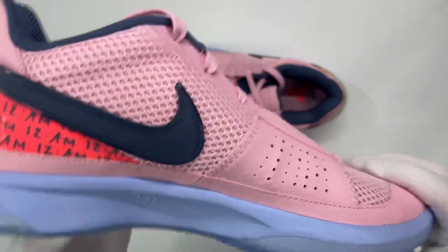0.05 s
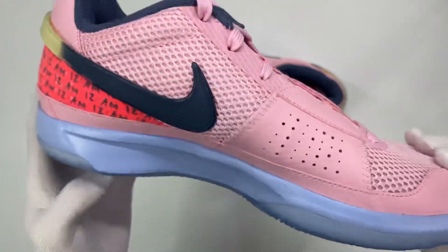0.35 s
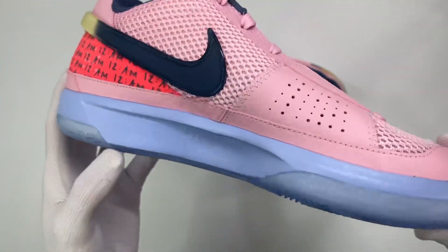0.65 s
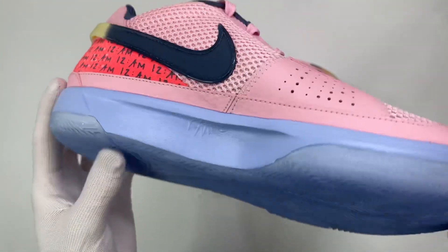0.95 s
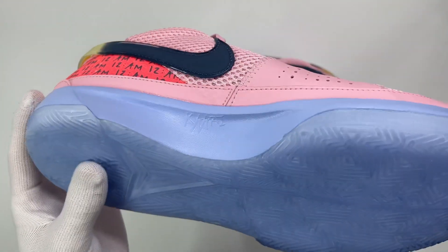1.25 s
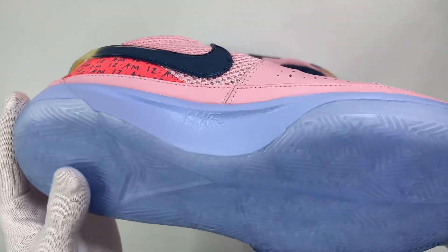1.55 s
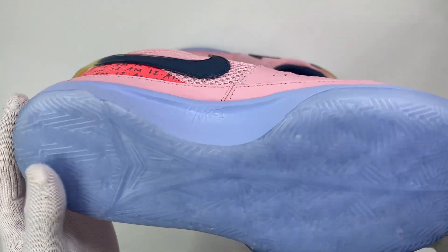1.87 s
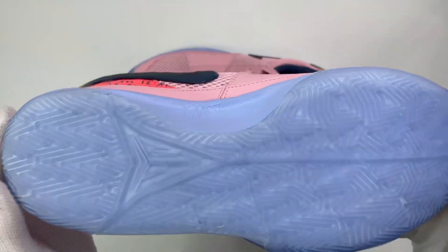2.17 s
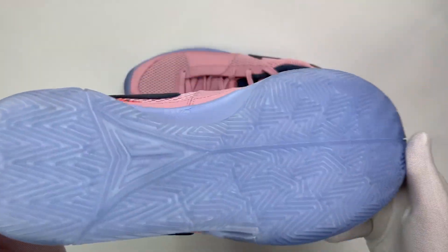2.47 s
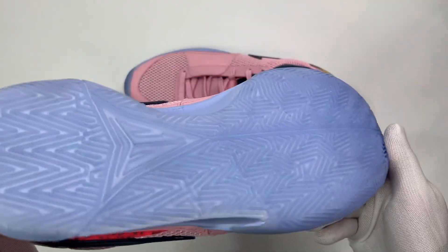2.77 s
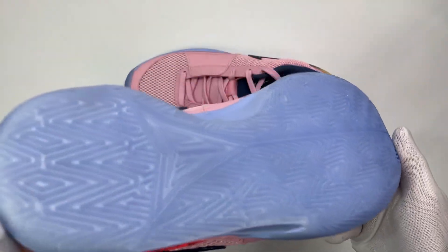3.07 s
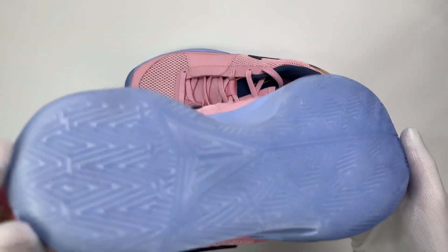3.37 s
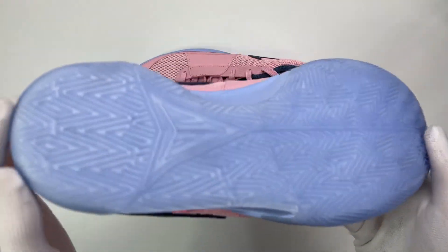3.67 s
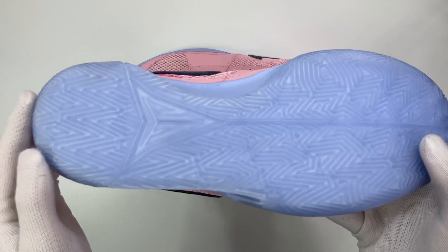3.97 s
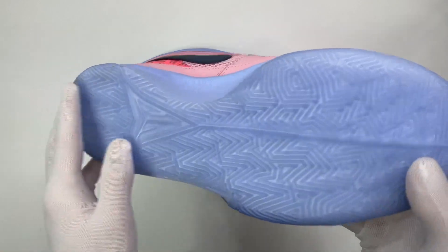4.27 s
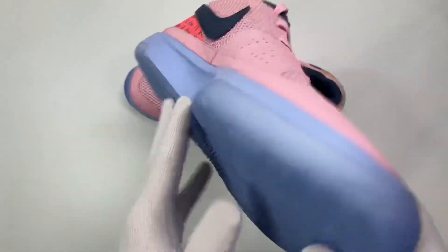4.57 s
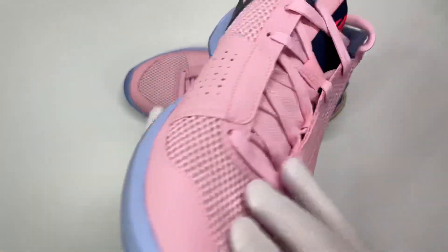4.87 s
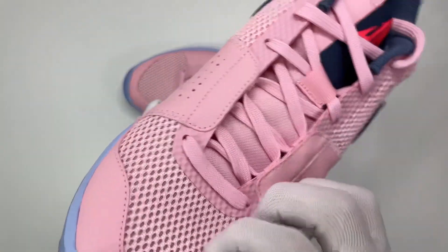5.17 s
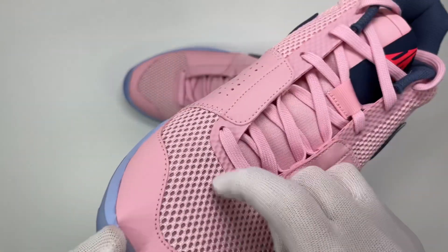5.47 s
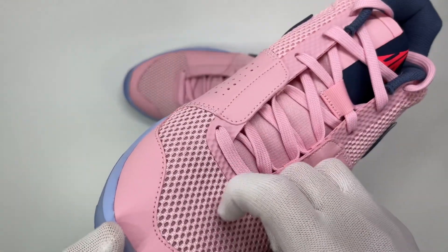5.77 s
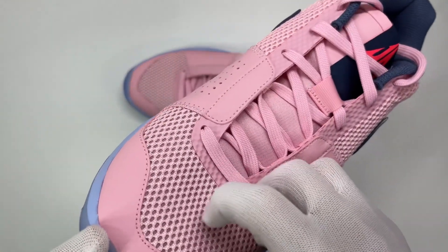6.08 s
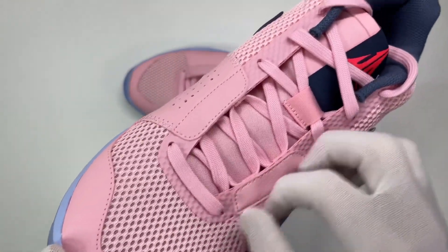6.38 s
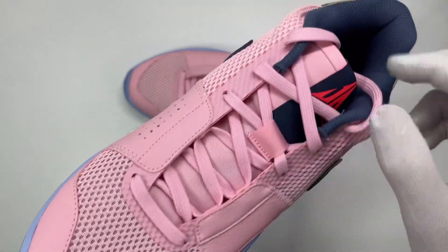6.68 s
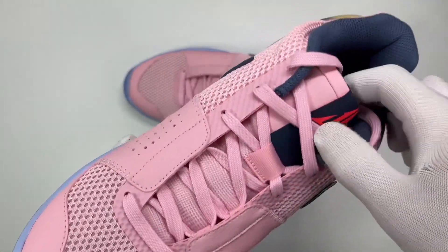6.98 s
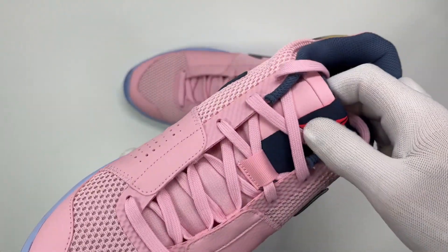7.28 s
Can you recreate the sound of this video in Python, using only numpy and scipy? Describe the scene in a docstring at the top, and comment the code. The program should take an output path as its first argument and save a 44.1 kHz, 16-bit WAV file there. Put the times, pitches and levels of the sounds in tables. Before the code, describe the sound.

Gloved hands turn a sneaker over, fabric rubbing and rasping on sole and mesh, with small ticks and a few hollow knocks.

```python
"""Gloved hands turn a sneaker over a table, close to a pair of microphone ports in a small room.
First the shoe rolls over: the knit hisses and rasps on sole and upper, and the friction sounds its hollow.
From 2.6 s the fingers shift round the sole, knocking softly as the rubber ticks; from 4.4 s it turns upright.
At 5.6 s a finger presses the mesh toe box three times, sticking and snapping from cell to cell.
From 6.2 s the hand slides up the laces to the tongue."""
import sys
import numpy as np
from scipy import signal
from scipy.fft import rfft, irfft, next_fast_len
from scipy.io import wavfile
from scipy.ndimage import uniform_filter1d

SR = 44100
rng = np.random.default_rng(int(sys.argv[2]) if len(sys.argv) > 2 else 0)


def output_pcm(signal):
    """Save a mono or channel-first signal as 16-bit PCM at the path in sys.argv[1].

    Samples are clipped to [-1, 1] before scaling.
    """
    pcm = np.clip(np.atleast_2d(signal).T, -1, 1) * 32767
    wavfile.write(sys.argv[1], SR, np.round(pcm).astype(np.int16))


N = 327663
TIME = np.arange(N) / SR


def gain_of(db):
    """Decibels to amplitude."""
    return 10 ** (np.asarray(db) / 20)


def unit_rms(x):
    """Scales to rms 1."""
    return x / np.sqrt(np.mean(x ** 2) + 1e-20)


def spectrum_db(points, hz):
    """Interpolates a spectrum table over log frequency."""
    f, db = np.transpose(points)
    return np.interp(np.log(hz + 1), np.log(f + 1), db)


def add(mix, start_s, sound):
    """Mixes a sound in at start_s."""
    part = mix[round(start_s * SR):][:len(sound)]
    part += sound[:len(part)]


def coloured(x, points):
    """Filters by a spectrum table."""
    size = next_fast_len(x.shape[-1])
    gain = gain_of(spectrum_db(points, np.fft.rfftfreq(size, 1 / SR)))
    return irfft(rfft(x, size) * gain, size)[..., :x.shape[-1]]


def resonate(x, hz, width_hz, stages=1):
    """Cascade of unity-gain resonances; the centre may move."""
    carrier = np.exp(2j * np.pi * np.cumsum(hz * np.ones(len(x))) / SR)
    pole = np.exp(-np.pi * width_hz / SR)
    for _ in range(stages):
        x = 2 * (carrier * signal.lfilter([1 - pole], [1, -pole], x / carrier + 1e-18)).real
    return x


def drift(rate_hz, points=N, t=TIME):
    """Gaussian values at rate_hz, joined by straight lines."""
    return np.interp(t * rate_hz, np.arange(points), rng.standard_normal(points))


# Spectra of room rumble and air: (frequency [Hz], level [dB])
RUMBLE_SPECTRUM = [(20, -45), (35, -18), (50, -7), (70, -1.5), (100, -4.5), (130, -14.5), (200, -21),
                   (400, -35.5), (1000, -68)]
AIR_SPECTRUM = [(150, -9), (270, 14), (400, -10), (600, -23), (1000, -12), (3000, -4), (7000, -10),
                (16000, -11)]
# Weight shifts of arms and shoe: (centre [s], half length [s], level [dB])
THUDS = [(4.3, 0.026, -60), (5.38, 0.37, -62.5), (5.775, 0.042, -51), (6.044, 0.027, -46),
         (6.264, 0.064, -54), (7.305, 0.52, -62)]


def background(rumble_db=-69.5, air_db=-77.5, unshared_db=-10.5):
    """Room rumble, dull thuds and faint air, mostly common to both ports."""
    noise = rng.standard_normal(N) + gain_of(unshared_db) * rng.standard_normal((2, N))
    thud_power = sum(gain_of(db) ** 2 * np.exp(-np.minimum(((TIME - s) / half_s) ** 2, 20))
                     for s, half_s, db in THUDS)
    rumble = unit_rms(coloured(noise, RUMBLE_SPECTRUM)) * np.sqrt(gain_of(rumble_db) ** 2 + thud_power)
    air = unit_rms(coloured(noise[:, ::-1], AIR_SPECTRUM)) * gain_of(air_db)
    return rumble + air


# Echoes off table and hands, and the room tail: (frequency [Hz], level re direct [dB])
NEAR_ECHOES = [(100, -21), (400, -4), (900, -1), (1600, -5), (3000, 0.5), (4600, -10), (5600, -13),
               (6200, -74), (7500, -14), (10200, -48), (16000, -18)]
ROOM_TAIL = [(100, -30), (200, -18), (400, -5.5), (1000, -6), (4000, -18), (5700, -47), (16000, -45)]


def reflections(x, spectrum, t60_s, drift_hz, paths, gap_s=0.002, pad=1024):
    """Decaying echoes, different at each port; the paths crossfade as shoe and hands move."""
    shares = np.array([drift(drift_hz, 256) for _ in range(paths)])
    shares /= np.linalg.norm(shares, axis=0)
    t = np.arange(pad + round(t60_s * SR)) / SR
    out = np.zeros((2, N))
    for share in shares:
        tail = rng.standard_normal((2, len(t))) * gain_of(-60 * t / t60_s) * (t > gap_s)
        tail = coloured(tail / np.linalg.norm(tail, axis=1, keepdims=True), spectrum)
        out += signal.oaconvolve((x * share)[None], tail[:, :-pad], axes=1)[:, :N]
    return out


# Phase of the right port behind the left: (frequency [Hz], lag [rad])
PORT_LAG = [(0, 0), (800, -1.1), (1500, -.1), (2900, 1.9), (4500, 1), (5900, np.pi), (14600, 5 * np.pi),
            (16000, 17.4)]


def ports(x):
    """Direct sound reaches the two ports out of phase."""
    lag = np.interp(np.fft.rfftfreq(N, 1 / SR), *np.transpose(PORT_LAG))
    return irfft(rfft(x) * np.exp(0.5j * np.array([lag, -lag])), N)


# Pitched catches of the glove: (centre [s], length [s], level [dB], pitch [Hz], width [Hz])
SCUFFS = [(3.167, 0.1, -64.5, 1120, 550), (6.358, 0.071, -48, 520, 150), (6.476, 0.14, -57, 865, 350),
          (6.516, 0.17, -48.5, 387, 83), (7.179, 0.13, -54.5, 840, 450), (7.263, 0.033, -43, 2770, 5460)]


def scuffs():
    """The glove grips briefly and chatters free."""
    out = np.zeros(N)
    for s, length_s, db, hz, width_hz in SCUFFS:
        swell = np.hanning(round(length_s * SR))
        chatter = resonate(rng.standard_normal(SR // 4), hz, width_hz, stages=2)[-len(swell):]
        add(out, s - length_s / 2, gain_of(db) * unit_rms(chatter) * swell)
    return out


# Rubber and lace tips: (time [s], level [dB], pitch [Hz], t60 [s], rattle re tick [dB])
TICKS = [(0.1357, -38, 4900, 0.003, -16), (0.902, -35.5, 11000, 0.001, -17),
         (2.6475, -41.5, 1970, 0.005, -2.5), (2.9577, -40, 1860, 0.0029, -6.5),
         (4.095, -40.5, 11700, 0.0015, -10.5), (4.6684, -21, 12000, 0.00072, -17.5),
         (5.6247, -43, 3450, 0.0015, -10), (6.037, -32.5, 8000, 0.00074, -8.5),
         (7.409, -28.5, 11500, 0.0006, -36)]


def ticks(rattle_t60_s=0.012):
    """A tiny snap rings for a few cycles and trails off in a fine rattle."""
    out, t = np.zeros(N), np.arange(SR // 20) / SR
    for s, db, hz, t60_s, rattle_db in TICKS:
        snap = np.sin(2 * np.pi * hz * t) * gain_of(-60 * t / t60_s)
        rattle = unit_rms(coloured(rng.standard_normal(len(t)), HISS_SPECTRUM))
        rattle *= gain_of(-60 * t / rattle_t60_s)
        add(out, s, gain_of(db) * (snap + gain_of(rattle_db) * rattle))
    return out


# Modes of the shoe: (frequency [Hz], width [Hz], level [dB])
SHOE_MODES = [(175, 14, -6), (230.8, 19, -1), (270.3, 12.3, 1), (383, 13.7, 3), (457.3, 7.9, -6.5),
              (490.7, 19.3, -1), (587, 53, -3), (624, 20, -5), (721, 12, -8), (844, 17, -10),
              (996, 136, -10)]


def shoe_ring(x, low_cut_hz=160, size=8192):
    """Minimum-phase response of the shoe; a small body radiates no deep bass."""
    hz = abs(np.fft.fftfreq(size, 1 / SR))
    power = sum(gain_of(db) ** 2 / (1 + (2 * (hz - f) / width) ** 2) for f, width, db in SHOE_MODES)
    power = power * hz ** 4 / (hz ** 4 + low_cut_hz ** 4)
    log_gain = np.log(power + 1e-10) / 2
    response = np.fft.ifft(np.exp(np.conj(signal.hilbert(log_gain)))).real
    return signal.oaconvolve(x, response[:size // 2])[:len(x)]


# Soft finger blows: (time [s], peak [dB], pitch [Hz], crunch re blow [dB])
KNOCKS = [(0.1358, -36.5, 680, -7), (0.9022, -49.5, 710, -14), (2.65, -60, 480, -15),
          (2.958, -54.5, 503, -9), (4.502, -42, 715, -19), (4.616, -43.5, 580, -10),
          (4.686, -38.5, 610, -12), (5.068, -36.5, 467, -5), (5.3235, -38, 626, -1.5),
          (5.3296, -32.5, 403, -15), (5.757, -25, 245, -29), (5.864, -40, 400, -14),
          (5.9934, -23, 430, -19), (6.009, -16.5, 375, -19), (6.018, -20.5, 290, -24),
          (6.038, -15.5, 314, -14.5), (6.134, -38.5, 450, -3), (6.155, -36, 300, -5.5),
          (6.992, -42.5, 560, -4), (7.09, -35, 656, -30), (7.358, -32, 598, -15)]


def knocks(push_s=0.00095, overshoot=0.4, flatten_s=0.00092, direct_db=-11, crunch_t60_s=0.0069):
    """A push, falling in pitch as the fingertip flattens, rings the shoe while the fabric crunches."""
    out, t = np.zeros(N), np.arange(SR // 5) / SR
    for s, db, hz, crunch_db in KNOCKS:
        cycles = np.cumsum(hz * (1 + overshoot * np.exp(-t / flatten_s))) / SR
        push = np.sin(2 * np.pi * cycles) * t * np.exp(-t / push_s)
        ring = unit_rms(shoe_ring(push)) + gain_of(direct_db) * unit_rms(push)
        crunch = unit_rms(resonate(rng.standard_normal(len(t)), hz=2010, width_hz=480))
        crunch *= gain_of(-60 * t / crunch_t60_s)
        add(out, s, gain_of(db) * (ring / abs(ring).max() + gain_of(crunch_db) * crunch))
    return out


# The glove jerks free, mostly from cell to cell of the mesh: (time [s], friction jump [dB])
SLIPS = [(0.136, 3), (5.6844, 10), (5.6997, 11), (5.7124, 8), (5.7272, 6), (5.749, 11), (5.7844, 14.5),
         (5.8732, 5), (5.9935, 3), (6.009, 9), (6.0175, 7), (6.038, 10)]


def stick_slip_db(stick_s=0.0047, stick_share=0.73, slip_s=0.0015):
    """Friction sinks while the fingertip sticks, leaps as it slips, then settles."""
    out = np.zeros(N)
    for s, jump_db in SLIPS:
        age_s = TIME - s
        fade = np.exp(-np.minimum(abs(age_s) / np.where(age_s < 0, stick_s, slip_s), 20))
        out += jump_db * np.where(age_s < 0, -stick_share, 1) * fade
    return out


def crackle(rasp_level, snap_gain_db=21.5, seam_gain_db=29.5, seams_per_s=45):
    """Each slip starts with a dry snap; seams and tread pluck the glove at random, more dully."""
    slips = np.zeros(N)
    slips[[int(s * SR) + 1 for s, _ in SLIPS]] = 1
    seams = rng.uniform(-0.85, 1, N) * (rng.random(N) < seams_per_s / SR)
    snaps = resonate(slips * rasp_level, hz=2300, width_hz=1700)
    plucks = resonate(seams * rasp_level, hz=1290, width_hz=1290)
    return gain_of(snap_gain_db) * snaps + gain_of(seam_gain_db) * plucks


def snags(per_s, spread_db, clump_db, clump_hz):
    """Threads catch and let go: clumps of tiny, uneven clicks."""
    sizes = rng.standard_normal(N) * gain_of(spread_db * np.minimum(rng.exponential(1, N), 4))
    clumps = gain_of(clump_db * drift(clump_hz))
    return unit_rms(sizes * (rng.random(N) < per_s / SR) * clumps)


def judder(pressure, per_s=160, release_s=0.001, light_depth=0.24, hard_depth=0.51):
    """Gain of jerky sliding: random catches start at once and die away, deeper under pressure."""
    kicks = rng.exponential(1, N).clip(0, 3) * (rng.random(N) < per_s / SR)
    catches = signal.lfilter([1], [1, -np.exp(-1 / (release_s * SR))], kicks)
    gain = 1 + (light_depth + (hard_depth - light_depth) * pressure) * catches
    return gain / np.sqrt(uniform_filter1d(gain ** 2, size=2600))


# Spectra of the knit's hiss and top fizz: (frequency [Hz], level [dB])
HISS_SPECTRUM = [(1500, -16), (3500, -5), (5600, 1.5), (8000, 3.5), (12000, -1.5), (14000, -3.5),
                 (16000, -19)]
FIZZ_SPECTRUM = [(4000, -59), (9000, -11), (12000, 17), (16000, -7)]


def knit_hiss(jerks, fizz_db):
    """Dense, fine snags merge into a hiss."""
    fine = snags(per_s=14000, spread_db=0, clump_db=1.47, clump_hz=148.3) * np.sqrt(jerks)
    hiss = unit_rms(coloured(fine, HISS_SPECTRUM))
    fizz = unit_rms(coloured(fine, FIZZ_SPECTRUM))
    return unit_rms(hiss + gain_of(fizz_db) * fizz)


# Spectrum of knit scraping the shoe: (frequency [Hz], level [dB])
RASP_SPECTRUM = [(150, -54), (400, -21), (900, 3), (1400, -0.5), (2200, -2), (3300, -3), (4700, -2.5),
                 (6400, -7.5), (10000, -17.5)]


def surface_rasp(jerks, pressure, grain_hz, grain_db=-12.5, pressed_boost_db=7.5):
    """Coarser snags; pressure brings out the grain, higher on fine tread than on open mesh."""
    coarse = snags(per_s=9000, spread_db=-0.35, clump_db=1.0, clump_hz=121.8) * jerks
    scrape = unit_rms(coloured(coarse, RASP_SPECTRUM))
    grain = unit_rms(resonate(coarse, grain_hz, width_hz=1900, stages=2))
    return unit_rms(scrape + gain_of(grain_db + pressed_boost_db * pressure) * grain)


# Fingertip drive, weak in the lowest modes: (frequency [Hz], level [dB])
FINGERTIP_SPECTRUM = [(240, -10), (380, -3)]


def shoe_hollow(jerks, hz, palm_db, overtone_db, width_hz=300, damped_share=0.6, damped_overtone_db=-4):
    """Friction sounds the hollow; the cupped hand damps the shoe's modes unless the palm bears down."""
    drive = snags(per_s=1800, spread_db=2.0, clump_db=2.0, clump_hz=70.8) * jerks
    fingers = unit_rms(resonate(coloured(drive, FINGERTIP_SPECTRUM), hz, width_hz, stages=2))
    overtone = gain_of(overtone_db) * unit_rms(resonate(drive, 2 * hz, 2 * width_hz, stages=2))
    palm = gain_of(palm_db) * unit_rms(resonate(drive, hz=218, width_hz=128))  # soft contact: low modes
    ringing = unit_rms(shoe_ring(fingers + overtone + palm))
    cupped = unit_rms(fingers + gain_of(damped_overtone_db) * overtone)
    damped = damped_share / (1 + gain_of(palm_db)) ** 2
    body = np.sqrt(1 - damped) * ringing + np.sqrt(damped) * cupped
    return body / np.sqrt(uniform_filter1d(body ** 2, size=1800) + 1e-12)


# Hand grips: (start [s], surface grain [Hz], palm weight [dB], hollow overtone [dB], knit fizz [dB])
GRIPS = [(0, 5000, -16.5, -4.5, -11.5), (.3, 4900, -6, -6, -3.5), (1.08, 4600, -9.5, -4.5, -26),
         (2.3, 1920, 0.5, -15, -8.5), (3.5, 2300, -2, 2, -6), (4.2, 3000, 1.5, -0.5, -8.5),
         (4.82, 3860, -3.5, -4, -47), (5.32, 2920, 1.5, -17, -12), (5.58, 2500, 7.5, -30, -15),
         (5.83, 2300, 4, -17, -22), (6.22, 3060, -8, -4, -15.5), (6.8, 3270, -11, -4.5, -13)]


def grip(blend_s=0.15):
    """Grain, palm, overtone and fizz over time; each grip holds, then blends into the next."""
    starts, *columns = np.transpose(GRIPS)
    row = sum(np.clip((TIME - s) / blend_s + 0.5, 0, 1) for s in starts[1:])
    return [np.interp(row, np.arange(len(GRIPS)), column) for column in columns]


# Glove strokes, levels before the trims in friction():
# (peak time [s], rise [s], fall [s], rasp [dB], hollow [dB], hiss [dB], hollow pitch [Hz])
STROKES = [ (.04, 0.11, 0.12, -56.5, -48, -56.5, 467), (0.148, 0.02, 0.17, -55, -49, -60, 568),
           (.38, 0.056, 0.17, -64.5, -63, -69.5, 580), (0.609, 0.058, 0.065, -62, -57, -65, 580),
           (.96, 0.074, 0.21, -70, -64.5, -69.5, 570), (1.19, 0.1, 0.14, -64, -63, -65.5, 584),
           (1.38, 0.052, 0.092, -66, -62.5, -65.5, 553), (1.545, 0.043, 0.074, -57.5, -59, -61.5, 586),
           (1.61, 0.031, 0.039, -78, -61, -69, 486), (1.705, 0.036, 0.093, -68, -65, -68, 554),
           (1.9, 0.07, 0.091, -63, -63, -65, 556), (2.025, 0.053, 0.1, -71, -67.5, -68.5, 550),
           (2.165, 0.047, 0.06, -77, -71.5, -69, 530), (2.6, 0.037, 0.096, -72, -73, -73, 530),
           (2.651, 0.011, 0.08, -66.5, -65.5, -68, 513), (2.963, 0.034, 0.13, -69.5, -67, -72, 540),
           (3.18, 0.06, 0.031, -69.5, -65.5, -72, 540), (3.61, 0.062, 0.14, -70, -64.5, -77, 550),
           (3.83, 0.092, 0.063, -65, -58, -65.5, 546), (4.07, 0.14, 0.12, -75.5, -66.5, -73.5, 517),
           (4.44, 0.22, 0.15, -62.5, -55.5, -59.5, 536), (4.56, 0.17, 0.27, -57, -53.5, -60, 530),
           (4.736, 0.12, 0.083, -54, -56.5, -58, 503), (4.909, 0.051, 0.11, -51, -57, -53, 543),
           (4.97, 0.069, 0.1, -54, -50, -50, 550), (5.1, 0.13, 0.16, -52.5, -51.5, -54, 497),
           (5.26, 0.067, 0.1, -58.5, -57, -77, 545), (5.331, 0.021, 0.021, -50, -46.5, -53, 470),
           (5.357, 0.012, 0.038, -49.5, -44.5, -56.5, 380), (5.42, 0.058, 0.098, -54, -54, -63, 456),
           (5.499, 0.063, 0.038, -53.5, -50.5, -59.5, 468), (5.628, 0.0092, 0.023, -64, -66, -63, 450),
           (5.718, 0.093, 0.067, -50, -51.5, -56, 330.5), (5.76, 0.055, 0.04, -53.5, -34, -60, 273),
           (5.88, 0.023, 0.035, -54.5, -35, -57.5, 386), (6.002, 0.046, 0.023, -44.5, -34, -46.5, 400),
           (6.046, 0.0091, 0.026, -60, -27.5, -66, 395), (6.09, 0.04, 0.054, -63.5, -48, -73, 400),
           (6.163, 0.017, 0.027, -56.5, -43, -61, 392), (6.28, 0.18, 0.32, -56.5, -51.5, -58.5, 520),
           (6.46, 0.075, 0.13, -73, -51, -66, 520), (6.64, 0.05, 0.041, -64.5, -48.5, -64, 463),
           (6.74, 0.1, 0.2, -79, -76, -93.5, 560), (6.838, 0.017, 0.058, -67.5, -58, -73, 482),
           (6.95, 0.072, 0.18, -69.5, -60.5, -71, 516), (7.01, 0.022, 0.092, -60.5, -47.5, -72, 542),
           (7.199, 0.14, 0.21, -55, -46.5, -63, 457), (7.38, 0.076, 0.23, -61.5, -47.5, -64, 447)]


def strokes(rest_db=(-82, -79.5, -81), rest_hz=535, creep_db=-0.5, creep_hz=7, edge_db=13.5):
    """Strokes swell over the holding hand's creep: rasp, hollow and hiss amplitudes, and hollow pitch."""
    t = TIME[::32]
    creep = gain_of(creep_db * drift(creep_hz, 256, t))
    power = (gain_of(rest_db)[:, None] * creep) ** 2
    weighted_hz = power[1] * rest_hz
    for s, rise_s, fall_s, rasp_db, hollow_db, hiss_db, hz in STROKES:
        slope = np.where(t < s, (abs(t - s) / rise_s) ** 2, (abs(t - s) / fall_s) ** 1.54)
        peak_db = np.array([[rasp_db], [hollow_db], [hiss_db]])
        stroke = gain_of(peak_db - edge_db * np.minimum(slope, 20)) ** 2
        power += stroke
        weighted_hz += stroke[1] * hz  # the strongest stroke tunes the hollow
    return [np.interp(TIME, t, curve) for curve in (*np.sqrt(power), weighted_hz / power[1])]


def friction(hollow_trim_db=-2.5, hiss_trim_db=3, hollow_slip_share=0.42, pitch_wander=0.088):
    """Knit slides on the shoe: strokes and slips drive hiss, rasp, hollow and crackle."""
    rasp_level, hollow_level, hiss_level, hollow_hz = strokes()
    grain_hz, palm_db, overtone_db, fizz_db = grip()
    slip = gain_of(stick_slip_db())
    rasp_level *= slip
    hiss_level *= slip * gain_of(hiss_trim_db)
    hollow_level *= slip ** hollow_slip_share * gain_of(hollow_trim_db)
    hollow_hz *= np.exp(pitch_wander * drift(rate_hz=25))  # fingers never lie still
    pressure = np.interp(20 * np.log10(rasp_level), [-56, -47], [0, 1])
    jerks = judder(pressure)
    hiss = hiss_level * knit_hiss(jerks, fizz_db)
    rasp = rasp_level * surface_rasp(jerks, pressure, grain_hz)
    hollow = hollow_level * shoe_hollow(jerks, hollow_hz, palm_db, overtone_db)
    return hiss + rasp + hollow + crackle(rasp_level)


def scene():
    """Hands on the shoe, heard directly and by way of table and room."""
    shoe = friction() + knocks() + ticks() + scuffs()
    near = reflections(shoe, NEAR_ECHOES, t60_s=0.025, drift_hz=14, paths=8)
    far = reflections(shoe, ROOM_TAIL, t60_s=0.26, drift_hz=4, paths=4)
    return ports(shoe + background()) + near + far


# Port balance: (frequency [Hz], left re right [dB])
PORT_BALANCE = [(160, 0.3), (300, -1.5), (600, -2.5), (1200, 0.5), (2800, -2.5), (4800, -5), (6000, 3.5),
                (16000, -3)]


def record(dry):
    """Frequency-dependent port balance, then the band limit."""
    balance_db = spectrum_db(PORT_BALANCE, np.fft.rfftfreq(N, 1 / SR))
    heard = irfft(rfft(dry) * gain_of(np.array([balance_db, -balance_db]) / 2), N)
    low_pass = signal.firwin(511, cutoff=15850, window=("kaiser", 9), fs=SR)
    return signal.oaconvolve(heard, low_pass[None], "same")


dry = scene()
out = record(dry)
output_pcm(out)
```